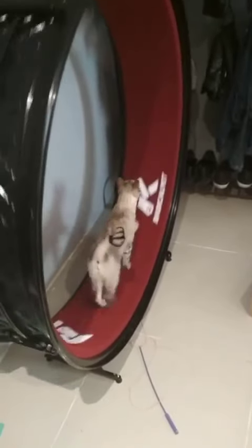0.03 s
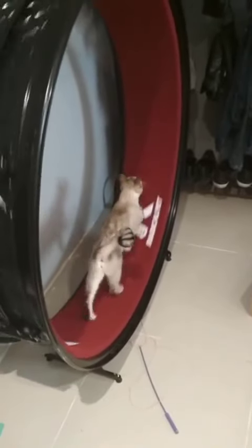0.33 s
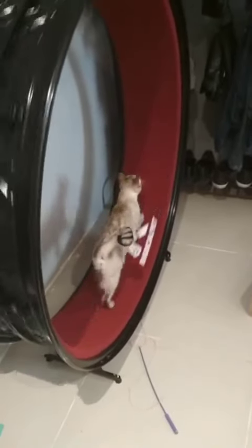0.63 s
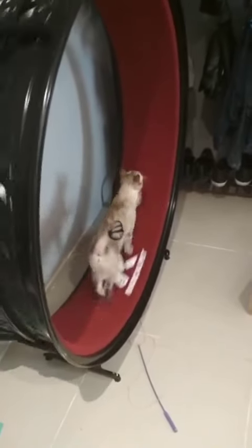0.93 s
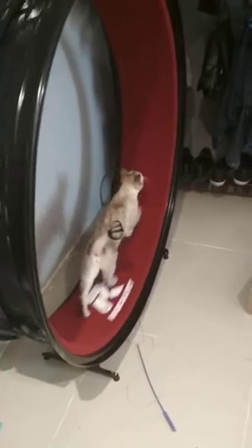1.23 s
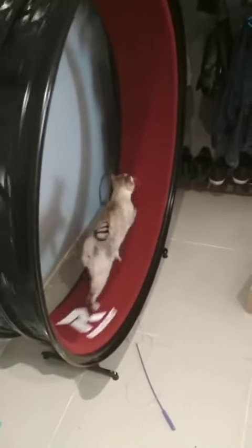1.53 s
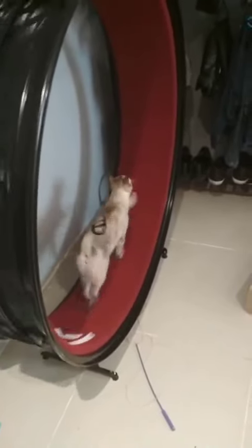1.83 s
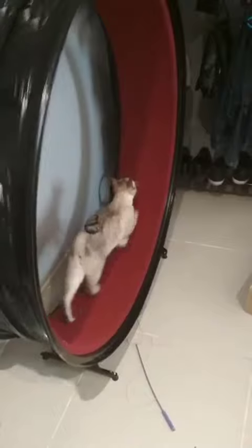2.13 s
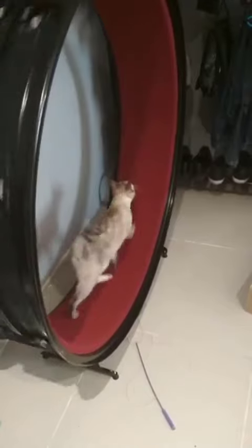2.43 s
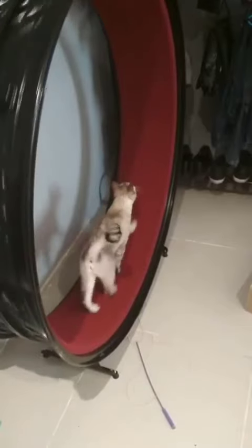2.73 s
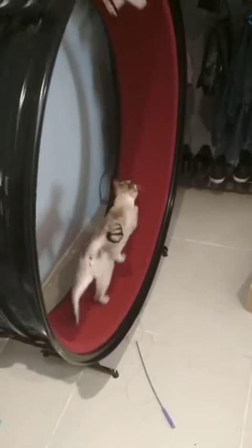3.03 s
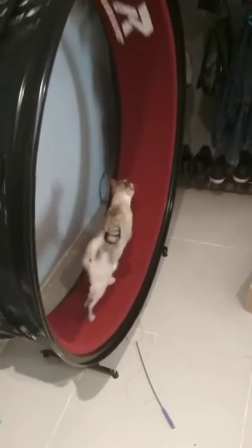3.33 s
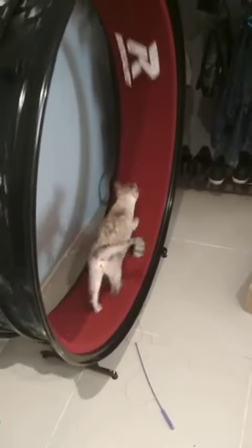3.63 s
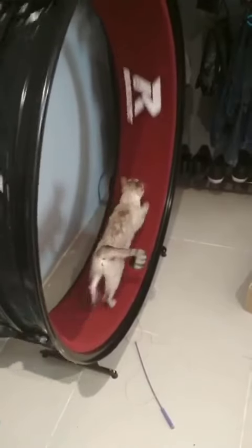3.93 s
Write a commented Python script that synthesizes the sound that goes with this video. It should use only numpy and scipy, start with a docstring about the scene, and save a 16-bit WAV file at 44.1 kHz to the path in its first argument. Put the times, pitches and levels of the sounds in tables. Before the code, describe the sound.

An exercise wheel turns with a steady, hollow rumble in a tiled room, slightly left of the microphone. The cat's paws thud softly and its claws tick, while the wheel gives three sharp, ringing knocks.

```python
"""Cat in an exercise wheel

A tiled room, a big plastic wheel a little left of a stereo microphone, far enough off for the walls
to answer. The rim rumbles over its rollers and the drum booms at its resonances as the cat walks.
Footfalls thud, and three sharp double snaps and light claw ticks ring in the room, over a faint
scuffing of paws on the tread."""
import sys
import numpy as np
from scipy import signal
from scipy.fft import rfft, irfft
from scipy.io import wavfile
from scipy.ndimage import uniform_filter1d

SR = 44100
rng = np.random.default_rng(int(sys.argv[2]) if len(sys.argv) > 2 else 0)


def dump(signal):
    """Clip the signal to [-1, 1] and save it as 16-bit WAV at the path in sys.argv[1]."""
    limited = np.clip(np.atleast_2d(signal).T, -1, 1)
    pcm = np.round(limited * 32767).astype(np.int16)
    wavfile.write(sys.argv[1], SR, pcm)


N = 176400

# Levels are relative within each table; colours give only the shape of a spectrum.
# the tiled room by band: frequency_hz, t60_s, early_db, tail_db
ROOM_BANDS = [(910, 0.38, -6.5, 6), (2200, 0.32, -6, 9), (4550, 0.36, 1.5, 5.5), (13000, 0.41, 5, 4.5)]
# stereo width at the microphone: frequency_hz, side_minus_mid_db
STEREO_WIDTH = [(30, -15.5), (130, -16), (260, -18), (400, -11), (550, -6.5), (900, 1.5), (3000, 1.5),
                (12000, 6)]
# paws brushing the tread: time_s, level_db
SCUFF_LEVEL = [(0, -87), (.28, -85.5), (.42, -84.5), (.6, -83.5), (.7, -90), (1.55, -85.5), (1.75, -78.5),
               (1.9, -78.5), (2.25, -77.5), (2.42, -83), (2.6, -82), (2.75, -76), (3.03, -75.5),
               (3.2, -78.5), (3.33, -75), (3.44, -77), (3.54, -78.5), (3.7, -83.5), (3.85, -82.5), (4, -78)]
# their hiss: frequency_hz, gain_db
SCUFF_COLOUR = [(1500, -4.5), (3500, -17.5), (5000, -10.5), (7500, 1.5), (9500, 2.5), (11800, 3.5),
                (13000, -14.5), (15500, -20.5)]
# a paw drags: centre_s, half_width_s, level_db, tilt_db_per_octave
PAW_DRAGS = [(.1, 0.057, -78.5, -7), (0.543, 0.067, -74.5, -3.5), (3.13, .06, -78, -9),
             (3.327, 0.11, -75, 1), (3.507, 0.13, -76.5, 0)]
# the rim rubs softly: centre_s, half_width_s, level_db, resonance_hz
RIM_RUBS = [(0.11, 0.39, -70, 1535), (0.635, 0.087, -72, 1387), (1.466, 0.061, -80, 1550),
            (1.752, 0.12, -81, 1690), (2.992, .06, -77.5, 1660), (3.268, 0.21, -78, 1823),
            (3.736, 0.13, -82.5, 1690)]
# spectrum of a rub: multiple_of_resonance, gain_db
RUB_COLOUR = [(.33, -23), (.55, -1), (.7, -11.5), (.79, 0), (.89, -3), (.96, -6.5), (1.001, 7.5),
              (1.04, -8.5), (1.12, -2), (1.27, -21.5), (2.3, -38.5)]
# the rim creaks: start_s, level_db, decay_s
RIM_CREAKS = [(1.885, -50, 0.0051), (1.896, -50, .005), (1.92, -60, .015)]
# spectrum of a creak: frequency_hz, gain_db
CREAK_COLOUR = [(500, -17), (900, 9), (1400, -10), (1700, 2), (2100, -18), (2400, -4), (2700, 4),
                (3000, -13), (3900, -15), (4300, 4), (4700, 3), (4980, 11.5), (5100, 4), (5250, 4.5),
                (5600, -1), (7300, -3), (7860, -1.5), (9000, -3.5), (11500, -6), (14000, -30)]
# claws touch the tread: start_s, level_db, decay_s
CLAW_TICKS = [(1.062, -55.5, 0.012), (1.09, -56.5, 0.033), (1.165, -70, 0.0055), (1.291, -49, 0.013),
              (1.32, -54, 0.064), (1.44, -69, 0.016), (1.645, -66, .03), (1.793, -66, .003),
              (2.125, -56.5, 0.028), (2.191, -57, 0.0077), (2.283, -60, 0.0073), (2.475, -65.5, 0.047),
              (2.68, -58.5, 0.037), (2.9796, -56, 0.0077), (3.9, -62, 0.023)]
# spectrum of claw ticks and paw drags: frequency_hz, gain_db
CLAW_COLOUR = [(1500, -17.5), (3500, -25), (4500, -13.5), (5500, -6), (7500, -2), (10000, 2.5), (12000, 3),
               (15500, -6.5)]
# the wheel jolts on its rollers: start_s, level_db, decay_s
JOLTS = [(2.012, -47, 0.0046), (2.064, -53, .003), (2.102, -43.5, 0.0015), (2.13, -59, 0.0064),
         (2.29, -56.5, 0.016)]
# spectrum of a jolt: frequency_hz, gain_db
JOLT_COLOUR = [(150, -4), (270, 4), (450, -0.5), (640, 4.5), (760, 9.5), (870, 7), (1050, -4), (1250, -10),
               (1600, -5), (2600, -30), (5000, -42)]
# paws land heavily: start_s, level_db
FOOTFALLS = [(1.41, -53), (1.625, -50.5), (2.008, -50.5), (2.245, -48), (2.34, -59), (2.435, -50),
             (3.335, -49), (3.49, -48), (3.695, -51)]
# what a footfall rings in the tread: pitch_hz, level_db, t60_s
TREAD_MODES = [(208, -2, 0.17), (277.7, -2, .22), (348.4, -4, 0.14), (424.3, 0, .2), (490, -9, 0.28)]
# the drum booms: centre_s, half_width_s, pitch_hz, level_db
DRUM_BOOMS = [(0.068, 0.11, 79.3, -51.5), (.21, 0.15, 77.6, -52.5), (0.702, 0.19, 77, -56.5),
              (0.968, .07, 78, -53.5), (1.12, 0.091, 78.3, -57.5), (1.45, 0.17, 79.3, -53),
              (0.618, 0.4, 205, -56), (1.11, 0.43, 206.4, -53), (1.477, 0.077, 134, -50),
              (1.62, 0.098, 80.6, -50.5), (1.87, 0.12, 77.1, -47), (1.98, 0.18, 75.6, -49.5),
              (2.033, 0.093, 255.5, -46.5), (2.117, 0.065, 256.3, -44), (2.08, 0.16, 276.6, -55.5),
              (2.12, 0.051, 129.9, -52), (2.47, 0.069, 246, -53.5), (2.543, 0.094, 137.1, -50),
              (2.654, 0.16, 78.5, -54.5), (2.77, 0.058, 130.6, -44.5), (3.195, 0.33, 221.5, -57),
              (3.687, 0.13, 232, -60.5), (3.556, 0.35, 350.5, -65), (3.861, 0.22, 79, -60)]
# the rim rolling: time_s, level_db
ROLL_LEVEL = [(0, -55.5), (.35, -57), (.8, -56.5), (1.3, -55), (1.5, -53.5), (1.75, -53.5), (2.05, -52),
              (2.25, -53), (2.45, -51), (2.62, -54), (2.8, -53), (2.95, -55), (3.2, -55), (3.45, -55.5),
              (3.7, -55), (4, -55.5)]
# its resonant body: frequency_hz, gain_db
ROLL_COLOUR = [(60, -29.5), (100, -11), (138, -3.5), (158, -0.5), (178, -8.5), (212, 1.5), (230, -6.5),
               (248, 2), (265, -5.5), (282, -0.5), (370, -9.5), (460, -10), (487, -9), (530, -16.5),
               (700, -32), (1100, -60)]
# the deepest rumble: time_s, level_db
RUMBLE_LEVEL = [(0, -53), (.1, -63.5), (.35, -59), (.52, -60.5), (.68, -57.5), (.9, -60.5), (1.2, -58),
                (1.7, -65), (1.9, -59), (2.1, -54.5), (2.35, -58.5), (2.8, -56), (3.05, -60.5),
                (3.2, -63.5), (3.53, -65), (3.66, -76), (3.9, -65), (4, -70)]
# its spectrum: frequency_hz, gain_db
RUMBLE_COLOUR = [(15, -35.5), (25, -19), (37, 1), (43, -2), (52, -3.5), (61, -1.5), (77, -2), (92, -6.5),
                 (130, -27), (300, -66)]
# the rollers' gritty whirr: time_s, level_db
WHIRR_LEVEL = [(0, -60.5), (.25, -62), (.52, -65.5), (.66, -65.5), (1.05, -68), (1.5, -68), (1.8, -66.5),
               (2.0, -61.5), (2.3, -67.5), (2.5, -72.5), (2.75, -69), (3.2, -73), (3.5, -73), (3.75, -74.5),
               (4, -75.5)]
# its spectrum: frequency_hz, gain_db
WHIRR_COLOUR = [(350, -7), (605, 1.5), (660, -4), (730, -4.5), (820, -1), (865, 6), (905, -0.5), (950, 4.5),
                (990, -4.5), (1060, -2.5), (1250, -11), (1350, -8.5), (1500, -15), (1700, -12), (2100, -28),
                (3000, -44.5), (6000, -43)]
# hard snaps and their rebounds: start_s, first_db, gap_s, second_db, tilt_db_per_octave, ring_db
DOUBLE_SNAPS = [(0.7525, -34.5, 0.0017, -29.5, -1, 1), (1.9694, -28.5, 0.0032, -32.5, 0.5, .5),
                (2.028, -49, 0.0032, -53, -3.5, -10), (2.1027, -48, 0.0025, -50, 2.5, -8.5),
                (2.8005, -36.5, .0062, -32, -1.5, 0)]
# spectrum of a snap before its tilt: frequency_hz, gain_db
SNAP_COLOUR = [(250, -18), (700, -7), (850, 4.5), (950, 6.5), (1060, -4), (1200, -6.5), (1600, -3.5),
               (2200, -7), (2700, -6.5), (3300, -4.5), (4200, -0.5), (5000, 3), (6500, 1.5), (8200, -2.5),
               (9700, 0.5), (11100, 5), (12200, -2.5), (13200, -7.5), (15500, -7.5)]
# what a snap rings in the drum: pitch_hz, level_db, t60_s
DRUM_MODES = [(482, -55, 0.91), (840, -62.5, 0.55), (946, -59, .48), (1320, -65, 0.58), (1690, -67, 0.49),
              (1860, -68.5, 0.29), (2506, -69.5, 0.38), (3220, -64, 0.29), (3950, -67, 0.28),
              (4870, -57, 0.22), (5230, -63, .33), (6640, -60.5, 0.43), (6630, -59, 0.35),
              (10660, -52.5, .3)]

ONSET_S = 0.00099  # build-up of the reflections and of the drum's ring


def undb(db):
    return 10 ** (np.asarray(db) / 20)


def unit_rms(x):
    return x / np.sqrt(np.mean(x ** 2))


def curve(rows):
    """Gain over time from (time_s, level_db) points."""
    return undb(np.interp(np.arange(N) / SR, *np.array(rows).T))


def swell(centre, half_width):
    """A smooth rise and fall."""
    return np.cos(np.pi / 2 * np.clip((np.arange(N) / SR - centre) / half_width, -1, 1)) ** 2


def wander(rate_hz):
    """Smooth random motion with an RMS of 1."""
    hold = int(SR / rate_hz)
    steps = np.repeat(rng.standard_normal(N // hold + 1), hold)
    return unit_rms(uniform_filter1d(uniform_filter1d(steps, hold), hold)[:N])


def over_hz(rows):
    """Values of (frequency_hz, value) points at every frequency bin."""
    hz, value = np.array(rows, float).T
    return np.interp(np.log(np.arange(N // 2 + 1) * SR / N + 1), np.log(hz), value)


def colour(x, rows, tilt=0):
    """Causal filter of unit power gain through (frequency_hz, gain_db) points; tilt in dB per octave."""
    gain = undb(over_hz([(hz, db + tilt * np.log2(hz)) for hz, db in rows]))
    cepstrum = irfft(np.log(unit_rms(gain)), N)
    cepstrum[1:N // 2] *= 2
    cepstrum[N // 2 + 1:] = 0
    return irfft(rfft(x) * np.exp(rfft(cepstrum)), N)


def pan(left_db):
    return undb(np.array([[left_db], [-left_db]]) / 2)


def spread(mid, side):
    """Left and right at the microphone: alike in the bass, diffuse in the treble."""
    width = undb(over_hz(STEREO_WIDTH))
    mid, side = np.array([rfft(mid), rfft(side) * width]) / np.hypot(1, width)
    return irfft(np.array([mid + side, mid - side]), N)


def linger(power, seconds):
    """Spreads energy over an exponential decay."""
    keep = np.exp(-1 / (seconds * SR))
    return signal.lfilter([1 - keep], [1, -keep], power)


def contacts(rows, rise_share=0.47):
    """Bursts of friction (start_s, level_db, decay_s), each with the energy of 10 ms at its level."""
    out, age = np.zeros(N + SR // 2), np.arange(SR // 2) / SR
    for start, db, decay_s in rows:
        span = age / max(decay_s, 1e-4)
        burst = rng.standard_normal(len(age)) * np.exp(-span) * np.minimum(span / rise_share, 1) ** 2
        i = int(start * SR)
        out[i:i + len(age)] += undb(db) * burst * np.sqrt(SR / 100 / np.sum(burst ** 2))
    return out[:N]


def ring(blows, modes, rise_s):
    """Blows (start_s, level_db) set modes ringing; each fades at its own rate."""
    out, age = np.zeros(N + SR // 2), np.arange(SR // 2) / SR
    hz, db, t60 = np.array(modes, float).T[:, :, None]
    envelope = undb(db - 60 * age / t60) * (1 - np.exp(-age / rise_s))
    for start, level in blows:
        phase = 2 * np.pi * (hz * age + rng.random(hz.shape))
        i = int(start * SR)
        out[i:i + len(age)] += undb(level) * np.sum(envelope * np.sin(phase), axis=0)
    return out[:N]


def room(x, beam_above_hz=3800, clump_db=4.5, early_fade_s=0.014):
    """Treble beams straight from the drum to the microphone; the tiles add early clumps and a tail."""
    power = linger(x ** 2 + 1e-20, ONSET_S)
    early = unit_rms(undb(clump_db * wander(1500))) ** 2 * linger(power, early_fade_s / 2)
    direct = signal.sosfilt(signal.butter(2, beam_above_hz, "high", fs=SR, output="sos"), x)
    out = direct * pan(left_db=6)
    noise = rfft(rng.standard_normal((2, N)))
    for hz, t60, early_db, tail_db in ROOM_BANDS:
        band = irfft(noise * over_hz([(row[0], row[0] == hz) for row in ROOM_BANDS]), N)
        tail = linger(power, t60 / np.log(1e6))
        out = out + band * np.sqrt(undb(early_db) ** 2 * early + undb(tail_db) ** 2 * tail)
    return out


def shell(x, spacing_hz=42.03, ripple_db=4):
    """The drum's many close resonances ripple the spectrum of whatever touches it."""
    hz = spacing_hz * np.arange(8, 400)
    peaks = np.clip(rng.standard_normal(len(hz)), -2, 2) * np.minimum(hz / 3500, 1)
    return colour(x, np.column_stack([hz, ripple_db * peaks]))


def scuffing(grain_db=1.5, flicker_db=2):
    """Pads and fur brush the tread in small grains; now and then a paw drags."""
    grains = rng.standard_normal((2, N)) * unit_rms(undb(grain_db * wander(400)))
    out = colour(grains, SCUFF_COLOUR) * curve(SCUFF_LEVEL)
    for centre, half_width, db, tilt in PAW_DRAGS:
        drag = colour(rng.standard_normal((2, N)), CLAW_COLOUR, tilt)
        out = out + drag * swell(centre, half_width) * undb(db)
    return out * undb(flicker_db * wander(34.87))


def rubbing(grain_db=3.5, gain_db=1.5):
    """The rim catches and slips past its guides, each rub with its own resonance."""
    grains = rng.standard_normal((2, N)) * unit_rms(undb(grain_db * wander(120)))
    out = 0
    for centre, half_width, db, hz in RIM_RUBS:
        tone = [(hz * multiple, gain) for multiple, gain in RUB_COLOUR]
        out = out + colour(grains, tone) * swell(centre, half_width) * undb(db)
    return out * undb(gain_db)


def creaks(gain_db=-18):
    """The rim creaks in short bursts of friction, heard across the room."""
    return undb(gain_db) * colour(room(contacts(RIM_CREAKS)), CREAK_COLOUR)


def claws(gain_db=-15.5):
    """Claws tick on the tread and the tiles answer brightly."""
    return undb(gain_db) * colour(room(contacts(CLAW_TICKS)), CLAW_COLOUR)


def jolts(through_stand_db=4, gain_db=-13):
    """The wheel jolts dully on its rollers, heard through the room and straight through the stand."""
    knocks = contacts(JOLTS)
    return undb(gain_db) * colour(room(knocks) + undb(through_stand_db) * knocks, JOLT_COLOUR)


def footfalls():
    """Paws land with a soft attack and ring the tread's low modes."""
    return ring(FOOTFALLS, TREAD_MODES, rise_s=0.011)


def booms(waver_hz=1.48, flutter_db=0.5, gain_db=1.5):
    """Resonances of the drum swell and fade as the load shifts."""
    out = 0
    for centre, half_width, hz, db in DRUM_BOOMS:
        phase = 2 * np.pi * np.cumsum(hz + waver_hz * wander(25.19)) / SR
        level = undb(db + gain_db + flutter_db * wander(30))
        out = out + swell(centre, half_width) * np.sin(phase) * level
    return out


def bumps(per_s=1600, scatter_db=3):
    """Small random bumps of the rim on its rollers."""
    hits = rng.random(N) < per_s / SR
    direction = np.sign(rng.standard_normal(N))
    return unit_rms(hits * direction * undb(scatter_db * rng.standard_normal(N)))


def rolling(body_db=2.5, rumble_db=0.5, whirr_db=0.17, grit_db=2.2):
    """Bumps shake the drum and its stand; the rollers whirr above them."""
    body = unit_rms(colour(spread(bumps(), bumps()), ROLL_COLOUR)) * curve(ROLL_LEVEL)
    rumble = unit_rms(colour(spread(bumps(), bumps()), RUMBLE_COLOUR)) * curve(RUMBLE_LEVEL)
    whirr = unit_rms(colour(spread(*rng.standard_normal((2, N))), WHIRR_COLOUR)) * curve(WHIRR_LEVEL)
    return body * undb(body_db) + rumble * undb(rumble_db) + whirr * undb(whirr_db + grit_db * wander(40.19))


def drum_ring(gain_db=-2.5):
    """The drum rings on after each snap."""
    blows = [(start, ring_db + gain_db) for start, *_, ring_db in DOUBLE_SNAPS]
    return spread(ring(blows, DRUM_MODES, ONSET_S), ring(blows, DRUM_MODES, ONSET_S))


def snaps(contact_s=1e-4, gain_db=-19):
    """Each snap or rebound is two hard contacts, milliseconds apart, that set the room ringing."""
    out = 0
    for start, first_db, gap, second_db, tilt, _ in DOUBLE_SNAPS:
        pair = contacts([(start, first_db, contact_s), (start + gap, second_db, contact_s)])
        out = out + colour(room(pair), SNAP_COLOUR, tilt)
    return out * undb(gain_db)


def scene():
    """From the microphone: the low sounds of the wheel just left of centre, the treble wide."""
    wheel = (rolling() + booms() + footfalls()) * pan(left_db=1.5)
    return wheel + drum_ring() + rubbing() + shell(snaps() + claws() + creaks() + jolts() + scuffing())


def record(dry, top_hz=15650):
    """The recorder cuts the highest treble steeply."""
    return signal.sosfilt(signal.ellip(10, .2, 70, top_hz, fs=SR, output="sos"), dry)


dry = scene()
out = record(dry)
dump(out)
```